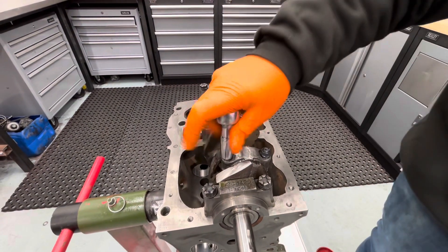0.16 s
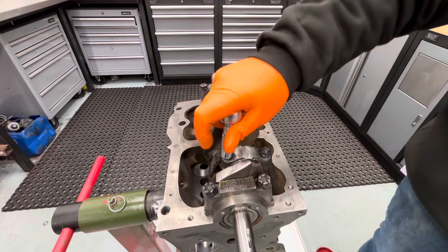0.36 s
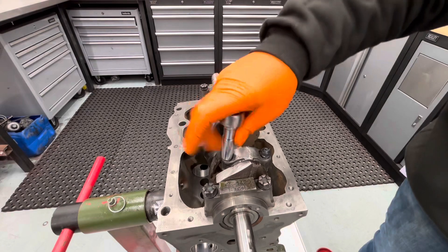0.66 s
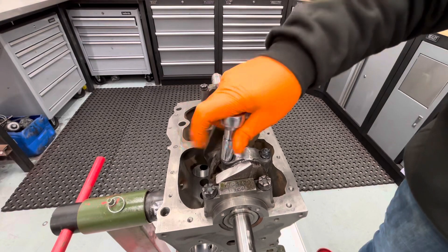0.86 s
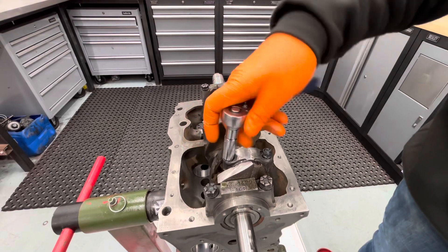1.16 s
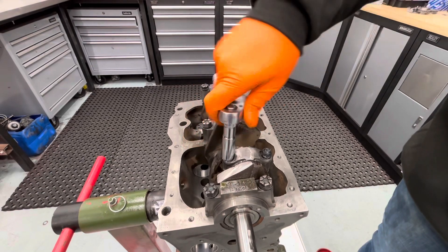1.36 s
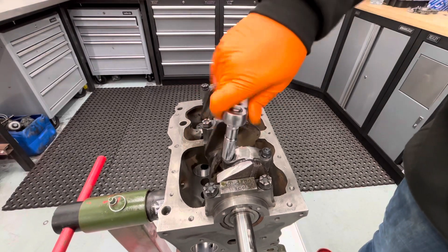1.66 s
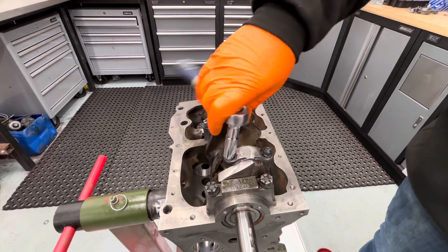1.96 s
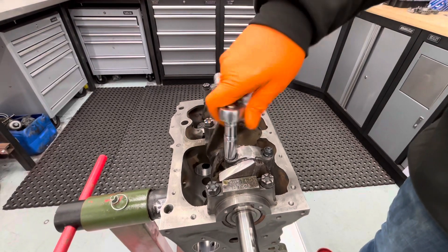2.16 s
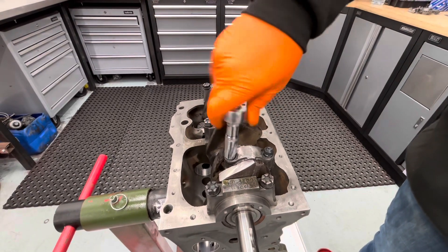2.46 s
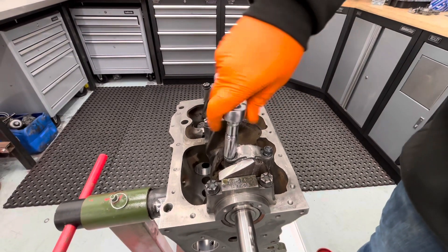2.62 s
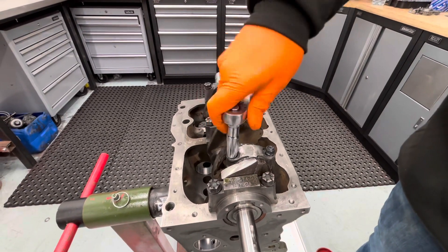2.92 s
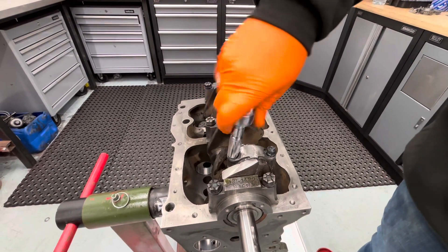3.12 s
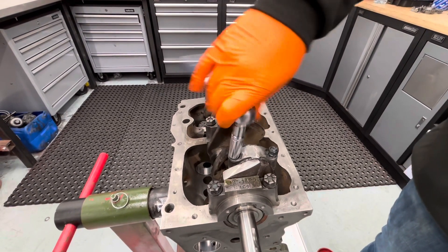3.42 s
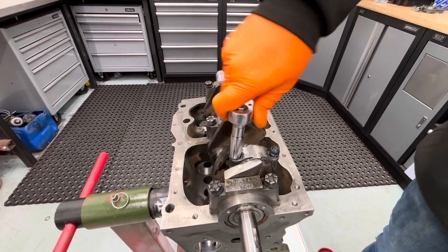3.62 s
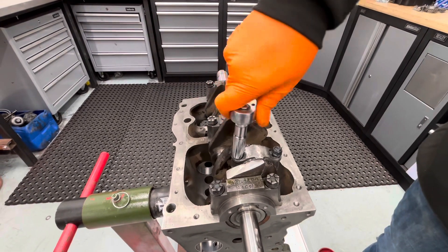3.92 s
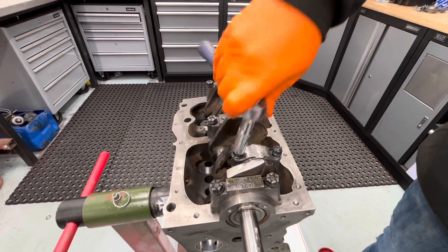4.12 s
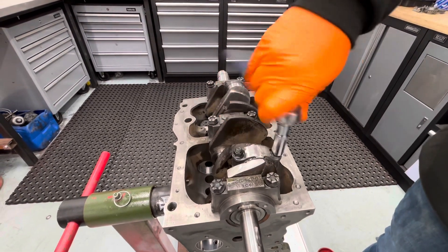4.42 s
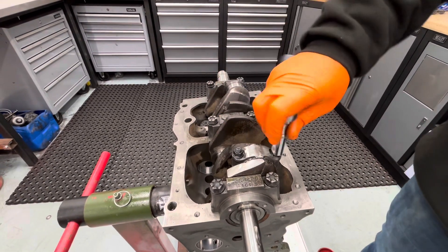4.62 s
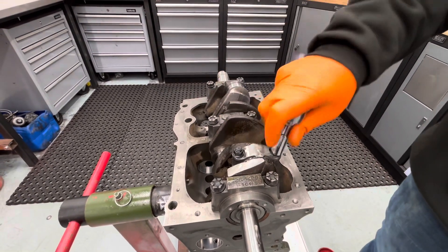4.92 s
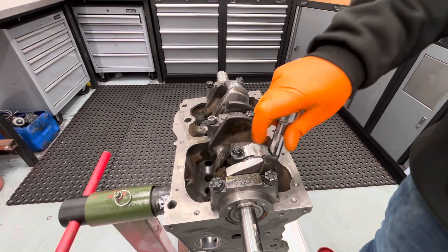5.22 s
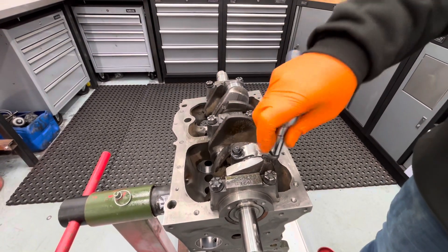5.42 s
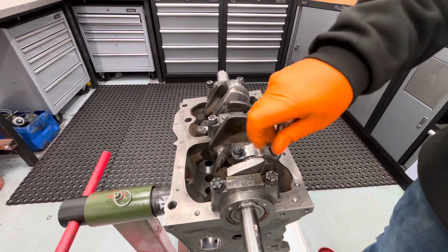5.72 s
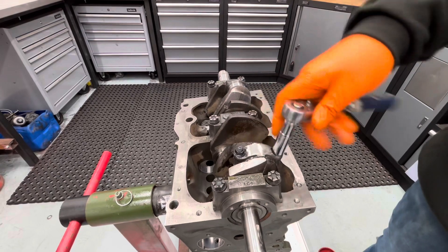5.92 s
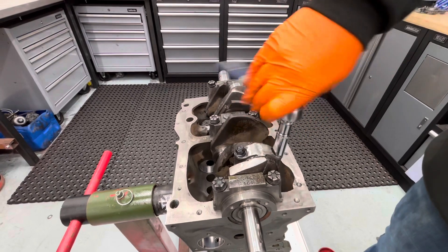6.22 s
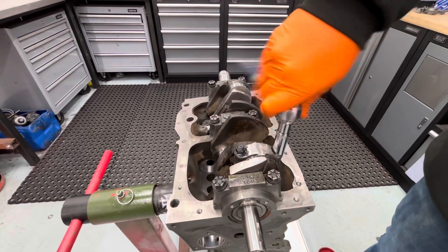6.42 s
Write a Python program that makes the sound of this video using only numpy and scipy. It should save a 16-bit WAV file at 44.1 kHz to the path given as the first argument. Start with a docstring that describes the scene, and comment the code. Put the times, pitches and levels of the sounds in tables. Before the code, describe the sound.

Close, crisp ratchet clicks on an engine block in a workshop. Eight quick, bright zips come in a steady run, with small socket clacks between. After a looser, sparser passage the zips turn into slower, softer rattles at a regular pace. The socket clinks onto another nut, quick zips return, then slower rattles finish. A faint low fan hum wavers behind, and the room leaves a short tail.

```python
"""A quick zip of ratchet teeth over a wavering fan hum: a hand ratchet runs nuts down bolts of an engine block.
On each back-stroke the pawl skips over the teeth, zipping when fingers twirl the head, rattling when the
handle swings. Each tooth is a shaped burst of noise that rings the steel tool; the socket clacks and chinks,
and soft knocks ring the casting. The block answers with quick reflections, the workshop with a decaying tail.
The fan is a set of wandering tones over a rush of air and a faint hiss."""
import sys
import numpy as np
from scipy import signal
from scipy.fft import rfft, irfft, next_fast_len
from scipy.io import wavfile

SR = 44100
rng = np.random.default_rng(int(sys.argv[2]) if len(sys.argv) > 2 else 0)


def dump_mix(stems):
    """Bounce the given channels to the path in sys.argv[1] as a 16-bit WAV at rate SR."""
    frames = np.atleast_2d(stems).T  # one column per channel
    limited = np.clip(frames, -1, 1)  # hard clip at full scale
    pcm = np.round(limited * 32767).astype(np.int16)
    wavfile.write(sys.argv[1], SR, pcm)


N = 289781
TIME = np.arange(N) / SR
SIZE = next_fast_len(N + SR // 100)
FREQ = np.maximum(np.fft.rfftfreq(SIZE, 1 / SR), 1)

# back-strokes of the ratchet, fast when twirled, slow when swung:
# [start t/s, length/s, top speed/teeth per s, relative level/dB, extra force on first teeth/dB, treble tint/dB]
BACKSTROKES = [(0.014, .025, 720, -30.5, -4, 0.5), (.134, 0.0285, 700, -31.5, 3, 2),
               (0.252, .035, 670, -33, 2, 2), (0.364, .031, 850, -31, -3, -1),
               (0.485, .032, 1000, -31.5, 2, 1.5), (0.593, .038, 650, -33, 1, 0),
               (0.715, .036, 830, -32.5, 2, 1), (0.831, .031, 750, -33, 4, 1),
               (0.9528, .011, 340, -36, 0, 2), (1.286, .056, 260, -38.5, 0.5, 0),
               (1.45, .045, 333, -36, 0, -4), (1.573, .0091, 230, -39.5, -1, -2),
               (1.8914, 0.022, 120, -45, 0, -7), (2.097, .008, 230, -42, 6, 5.5),
               (2.584, .053, 333, -37, 3, -3), (2.739, .042, 260, -38.5, -1, 0.5),
               (2.887, .04, 310, -37.5, -1, -0.5), (3.0238, .04, 375, -37, -0.5, 0.5),
               (3.173, .038, 290, -38.7, -1, -0.5), (3.3138, .046, 306, -39, 1, -2),
               (3.4538, .044, 310, -36, 2, -1), (3.5968, .047, 303, -37, 3, -1.5),
               (3.735, .043, 363, -35, -1, -1.5), (3.872, .041, 340, -36, -1, 0),
               (4.01, .04, 350, -37, -1.5, 0.5), (4.145, 0.019, 300, -39.5, 0, 2.5),
               (4.543, .013, 220, -46, -5, 6), (4.69, .027, 410, -40.5, 3, -0.5),
               (4.831, .033, 660, -33, -1.5, -2), (4.9646, 0.0251, 800, -31, -5, -3),
               (5.094, .031, 600, -31.5, 1, -2.5), (5.22, .032, 800, -34, -1, -1.5),
               (5.356, .043, 750, -35, 3, -1), (5.483, .038, 560, -35, -1, 1),
               (5.616, .037, 700, -34, -1, -1.5), (5.751, 0.033, 282, -38, -13, -0.5),
               (6.068, .054, 257, -37, 5, -3.5), (6.249, .046, 353, -39, -3, -1.5),
               (6.396, .052, 400, -40.5, -1, -1), (6.539, .043, 350, -40.5, 1.5, 0.5)]
TWIRL_TEETH_PER_S, FULL_SWING_S = 500, .03   # twirled from this speed up; a longer slow stroke is a full swing
NUT_CHANGE_S = 4.3   # work moves from the first nut to the second
CLANK_HZ, SPARKLE_HZ = 3500, 9000   # clank is the part below, sparkle the part above
NUDGE_CLANK_DB = 1   # low clank of a tool that is only nudged
STROKE_SPARKLE_DB = -1.04   # treble tint of the pawl on the teeth, before that of each stroke


def from_db(db):
    """Decibels to gain."""
    return 10 ** (np.asarray(db) / 20)


def rms_one(x):
    """Scale to rms 1."""
    return x / np.sqrt(np.mean(x ** 2) + 1e-20)


def at_hz(points, hz):
    """Read a table on a log-frequency axis, level beyond its ends."""
    points = np.array(points)
    return np.interp(np.log(hz), np.log(points[:, 0]), points[:, 1])


def to_time(spectrum):
    """From a spectrum back to sound."""
    return irfft(spectrum, SIZE)[..., :N]


def colour(x, gain_db):
    """Filter by a gain in dB at every frequency."""
    return to_time(rfft(x, SIZE) * from_db(gain_db))


def noise(spectrum):
    """Steady noise of the given colour, rms 1."""
    return rms_one(colour(rng.standard_normal(N), at_hz(spectrum, FREQ)))


def drift(rate):
    """Slow random wander, mostly below the rate in Hz, with rms 1."""
    return rms_one(to_time(rfft(rng.standard_normal(SIZE)) / (1 + (FREQ / rate) ** 2)))


def convolve(x, response):
    """Pass a sound through a response in each channel."""
    return signal.fftconvolve(np.atleast_2d(x), np.atleast_2d(response), axes=-1)[:, :N]


def ringing(modes):
    """Response of a set of decaying modes (Hz, dB, t60 s), half a second long."""
    t = TIME[:SR // 2]
    return sum(from_db(db - 60 * t / t60) * np.sin(2 * np.pi * hz * t) for hz, db, t60 in modes)


def impulses(times, sizes):
    """A train of single-sample blows."""
    at = np.round(np.asarray(times) * SR).astype(int)
    return np.bincount(np.maximum(at, 0), sizes, N)[:N]


def on_nut(table, nut):
    """The dB curve of a table for the first (0) or second (1) nut."""
    return at_hz(np.array(table)[:, [0, nut + 1]], FREQ)


def by_nut(x):
    """Split a sound into what happens on the first nut and on the second."""
    return enumerate([x * (TIME < NUT_CHANGE_S), x * (TIME >= NUT_CHANGE_S)])


def spread(mid, side):
    """Diffuse sound: mixing two noises sets how alike the left and right channels are at each frequency."""
    # likeness of the air noise left and right: [f/Hz, correlation]
    likeness = [(30, 0.096), (70, 0), (150, 1), (350, 0.74), (700, 0), (1500, 0), (15000, 0.000087)]
    alike = np.clip(at_hz(likeness, FREQ), -.99, .99)
    shared = rfft(mid, SIZE) * np.sqrt((1 + alike) / 2)
    opposed = rfft(side, SIZE) * np.sqrt((1 - alike) / 2) * [[1], [-1]]
    return to_time(shared + opposed)


def fan(waver=0.46, waver_hz=3.3, width_db=-17.5, rush_db=-48.5, hiss_db=-57.5):
    """The fan behind: steady tones that wander in strength and phase, on a rush of air with a faint hiss."""
    # tones of the hum: [f/Hz, level/dB rms]
    hum_tones = [(71, -69), (93, -65), (107, -66), (115, -63), (130, -62.5), (153, -69), (188, -62),
                 (212.2, -59.5), (215.7, -53.5), (219, -61.5), (237, -65), (290, -64), (317.6, -58.5),
                 (325, -63.5), (349.9, -57.5), (372, -66), (393.5, -62), (416, -61), (436, -62),
                 (446, -62.5), (455, -64.5), (482, -66.5), (501.5, -64.5), (595, -69), (668, -68.5),
                 (698, -71.5), (725, -68), (786, -64.5), (797, -70)]
    # colour of the rush, which sets its shape only: [f/Hz, density/dB per Hz]
    rush_spectrum = [(25, -44), (55, -49), (75, -14), (115, 1.5), (165, -3), (235, 1.5), (268, -7),
                     (310, 5.5), (380, -1), (450, -1), (530, -4), (810, -0.5), (840, -8.5), (1000, -10.5),
                     (1400, -16.5), (2500, -58)]
    # colour of the hiss, which sets its shape only: [f/Hz, density/dB per Hz]
    hiss_spectrum = [(500, 9), (1500, 1.5), (2500, 7), (4000, 3), (8000, -3), (15000, -13)]
    wander, tones = drift(waver_hz), np.zeros((2, N))
    steady_power = np.sqrt(2 / (1 + 2 * waver ** 2))   # makes up for the power that wavering adds
    for hz, db in hum_tones:
        angle = 2 * np.pi * (hz * TIME + rng.random())
        # every tone takes the same wander at shifts of its own
        strength, phase, sway = [np.roll(wander, shift) for shift in rng.integers(N, size=3)]
        width = from_db(width_db) * sway * [[1], [-1]]   # a little different left and right
        tone = (1 + waver * strength) * np.cos(angle) + (waver * phase + width) * np.sin(angle)
        tones += from_db(db) * steady_power * tone
    mid, side = [from_db(rush_db) * noise(rush_spectrum) + from_db(hiss_db) * noise(hiss_spectrum)
                 for _ in range(2)]
    return tones + spread(mid, side)


def teeth(end_speed=.6, twirl_end_speed=.3, jitter=0.06, uneven_db=1.5, stroke_db=-1.0, first_teeth=2.0):
    """Rows (s, dB, clank, sparkle), one per tooth: the wheel speeds up, slows, then coasts over a few soft teeth."""
    # lone teeth, when the handle is only nudged or the pawl catches and snaps hard: [t/s, energy/dB]
    lone_teeth = [(.0078, -10), (0.1426, -6.5), (0.2555, -12), (.3638, -19), (1.581, -16.5), (1.6965, -17),
                  (1.709, -16), (1.7198, -16), (1.7245, -14.5), (1.7298, -12.5), (1.8264, -13),
                  (1.833, -24), (1.8407, -14), (2.0842, -15), (2.0883, -12.5), (2.105, -15),
                  (2.1185, -13.5), (2.1278, -18), (2.2402, -15.5), (2.243, -21), (2.25, -15.5),
                  (2.4025, -16), (2.41, -19), (3.1683, -14), (3.172, -14), (3.63, -11), (4.4399, -20.5),
                  (4.452, -19), (4.539, -19.5), (5.7502, -21), (6.062, -13), (6.2465, -13), (6.3961, -19),
                  (6.4005, -16)]
    # rise towards mid-stroke at the speed of a swing; faster strokes swell more, slow ones may sag
    swell_db, swell_db_per_octave, swing_teeth_per_s = 0.5, 4, 300
    swing_coast_db, twirl_coast_db = -5, -38   # a swing carries on softly at its end; a twirl stops short
    swing_clank_db, twirl_clank_db = 0.5, 2.5
    first_tooth_sparkle_db = 5   # the first drops of a swing are brighter
    wobble_db, wobble_s = 1.5, .0035   # the wheel rocks in the head: stronger and weaker bunches of teeth

    rows = []
    phase = np.linspace(0, 1.3, 260)   # in stroke lengths; the wheel coasts after 1
    arch = np.maximum(np.sin(np.pi * phase), 0)
    coasting = np.maximum(phase - 1, 0) / (phase[-1] - 1)
    for start, length, top, db, bite_db, tint_db in BACKSTROKES:
        slip, catch = rng.standard_normal(128), rng.exponential(1, 128)
        swung = top < TWIRL_TEETH_PER_S
        coast_db = swing_coast_db if swung else twirl_coast_db
        swell = swell_db + swell_db_per_octave * np.log2(top / swing_teeth_per_s)

        slowest = end_speed if swung else twirl_end_speed   # share of top speed
        speed_arch = np.sqrt(arch) if swung else arch
        speed = top * (slowest + (1 - slowest) * speed_arch) * (1 - .5 * coasting)
        passed = np.cumsum(speed) * length * phase[1]
        tooth = np.arange(int(passed[-1]) + 1)
        when = np.interp(tooth + jitter * slip[tooth], passed, phase)

        early = np.exp(-tooth / first_teeth)   # weight on the first teeth, while the wheel is still slow
        force_db = np.interp(when, phase, swell * arch + coast_db * coasting) + bite_db * early
        force_db = force_db + uneven_db * np.minimum(catch[tooth], 4)   # now and then a tooth snaps harder
        rocking = rng.standard_normal(32)
        force_db = force_db + wobble_db * np.interp(when * length / wobble_s, np.arange(len(rocking)), rocking)

        # the energy of the stroke is shared among its teeth
        share_db = 10 * np.log10(length * SR / np.sum(from_db(force_db) ** 2))
        level = db + stroke_db + force_db + share_db
        sparkle = STROKE_SPARKLE_DB + tint_db + first_tooth_sparkle_db * early * swung
        if not swung:
            clank = twirl_clank_db
        elif length > FULL_SWING_S:
            clank = swing_clank_db
        else:
            clank = NUDGE_CLANK_DB
        rows += [(start + u * length, d, clank, high) for u, d, high in zip(when, level, sparkle)]
    return rows + [(s, db, NUDGE_CLANK_DB, STROKE_SPARKLE_DB) for s, db in lone_teeth]


def socket_play(click_db=-4.5, take_up_lead_s=0.0098, take_up_db=-23.5):
    """Rows (s, dB, clank, sparkle): the loose socket clacks on the nut, takes up its play and ticks after strokes."""
    # single clacks of the socket against the nut: [t/s, energy/dB before click_db]
    nut_clacks = [(0.2463, -25), (.3505, -17), (.402, -3.5), (1.0345, -20), (1.0703, -9), (1.431, -18.5),
                  (1.636, -20.5), (1.683, -18.5), (1.769, -19), (1.808, -24), (1.817, -22), (2.004, -23.5),
                  (2.03, -16), (2.154, -19), (2.187, -20.5), (2.3843, -13), (2.3875, -14.5),
                  (2.5674, -11.5), (2.715, -23), (2.802, -18), (3.229, -13), (4.134, -20), (4.3146, -13),
                  (4.3164, -18), (4.353, -13.5), (4.355, -12), (4.3575, -21), (4.382, -29), (4.502, -23),
                  (5.479, -20), (5.92, -27.5), (6.029, -19.5), (6.0419, -26), (6.319, -13)]
    clank_db, sparkle_db = 7.5, -4   # the socket sounds duller than the pawl
    rattle_within_s, rattle_db, rattle_spread_db = 0.096, -33, 2   # one faint tick after each stroke
    clacks = [(s, db + click_db) for s, db in nut_clacks]
    # before a full swing, the play in the socket is taken up with a soft click
    take_ups = [(start - take_up_lead_s, take_up_db) for start, length, top, *_ in BACKSTROKES
                if top < TWIRL_TEETH_PER_S and length > FULL_SWING_S]
    ticks = []
    for start, length, *_ in BACKSTROKES:
        when, size = rng.random(2)
        ticks.append((start + length + rattle_within_s * when, rattle_db + rattle_spread_db * (2 * size - 1)))
    return [(s, db, clank_db, sparkle_db) for s, db in clacks + take_ups + ticks]


def tool_ring(x, grip_s=.13, grip_db=-0.5, grip_pitch=0.0057):
    """The snaps ring in the steel; each new grip shifts the strength and pitch of every resonance."""
    # resonances of ratchet head, extension and socket, before the pawl colour:
    # [f/Hz, gain on first nut/dB, gain on second nut/dB, t60/s]
    tool_modes = [(2486, 1, -1, 0.019), (2610, -6, 4, 0.15), (3390, -16, -3, 0.018), (4740, -13, -8, .04),
                  (5040, -7, -8, 0.1), (6320, -4, -9, 0.013), (6780, -4.5, -15, 0.016),
                  (7300, -4, -21, 0.018), (10100, -6, -11, 0.027), (10460, -3, -4, 0.11),
                  (10600, -3, 10, 0.11), (14700, -7, -15, .012), (15300, -7, -5, 0.01)]
    t, hop = TIME[:SR // 12], round(grip_s * SR)
    hz, first_db, second_db, t60 = np.transpose(tool_modes)[:, :, None]
    damping = np.log(1000) / t60
    decay = 2 * damping / SR * np.exp(-damping * t)   # gain 1 on top of each resonance
    out = np.zeros((2, N + hop + len(t)))
    for at in range(0, N, hop):
        held, detuned = rng.standard_normal((2, len(hz), 1))
        nut_db = first_db if at / SR < NUT_CHANGE_S else second_db
        db = nut_db + grip_db * np.clip(held, -2, 1)
        gripped_hz = hz * (1 + grip_pitch * detuned)
        ring = np.sum(from_db(db) * decay * np.cos(2 * np.pi * gripped_hz * t), axis=0)
        rung = signal.fftconvolve(x[:, at:at + hop], ring[None], axes=-1)
        out[:, at:at + rung.shape[1]] += rung
    return x + out[:, :N]


def ratchet(snap_s=0.00019, snap_slope=0.81, colour_db=1.5, turn_db=1.2, alike=.62, lag_s=.00005,
            bounce_s=0.00063, bounce_share=0.079, pawl_db=-0.5):
    """Each drop of the pawl is a sharp snap and a bounce, with a colour of its own, which sets the tool ringing."""
    # colour of the snaps and their ring: [f/Hz, gain on first nut/dB, gain on second nut/dB]
    pawl_colour = [(900, -12, -9.5), (1650, -10.5, -9), (2250, -5, -5), (2720, -7.5, -7.5),
                   (3680, 0.5, -0.5), (4430, 3.5, 6), (5600, 2.5, 4.5), (6300, 2, 1), (7360, 0, 4),
                   (8300, 2.5, 4.5), (9200, 2, 7.5), (10630, 8, 8), (11240, 1.5, 4), (13000, 6, 9.5),
                   (14600, 4.5, 5.5), (15500, 0.5, 3)]
    s, db, clank, sparkle = np.transpose(teeth() + socket_play())
    bounce_at = s + bounce_s * (.5 + rng.random(len(s)))
    share = np.clip(2 * bounce_share * rng.random(len(s)), 0, 1)   # of the energy
    # fine grain of the snaps, partly the same left and right
    own = rng.choice([-1., 1.], (2, N))
    grain = np.where(rng.random(N) < alike, own[0], own)
    centres, spectrum = np.array([2400, 4400, 6400, 8300, 10600, 14000]), 0   # band centres in Hz
    turn_times = TIME[::SR // 10]
    for hz in centres:
        fade = np.exp(-(hz / SPARKLE_HZ) ** snap_slope / (snap_s * SR))   # the low part of a snap lasts longer
        level = db + clank * (hz < CLANK_HZ) + sparkle * (hz > SPARKLE_HZ)
        level = level + colour_db * rng.standard_normal(len(s))
        # the tint shifts as the tool turns
        level = level + turn_db * np.interp(s, turn_times, rng.standard_normal(len(turn_times)))
        power = from_db(level) ** 2
        blows = impulses(s, (1 - share) * power) + impulses(bounce_at, share * power)
        energy = signal.lfilter([(1 - fade) ** 2], [1, -2 * fade, fade ** 2], blows + 1e-18)
        band = np.interp(FREQ, centres, centres == hz)
        spectrum = spectrum + rfft(np.sqrt(np.abs(energy)) * grain, SIZE) * band
    radiated = FREQ / np.hypot(FREQ, 600)   # a small part radiates little bass
    arrival = np.exp(-2j * np.pi * FREQ * [[lag_s], [0]])   # reaches the left channel later
    snaps = tool_ring(to_time(spectrum * radiated * arrival))
    return sum(colour(part, pawl_db + on_nut(pawl_colour, nut)) for nut, part in by_nut(snaps))


def knocks(low_hz=300):
    """A few soft blows ring the modes of the heavy casting, which gives out little below its lowest mode."""
    # dull knocks on the engine: [t/s, strength/dB]
    blow_list = [(0.0874, -44), (0.0903, -46.5), (0.0934, -49.5), (0.0969, -40.5), (0.0991, -43),
                 (0.1171, -48)]
    # what a knock rings with, before the low cut: [f/Hz, level/dB, t60/s]
    casting_modes = [(355, -2, 0.089), (406, 2, 0.096), (460, -3, .06), (510, -2.5, 0.092), (576, 5, 0.04),
                     (666, 0, 0.04), (840, -9, 0.015), (1093, -2, 0.03), (1360, -14, 0.025),
                     (1730, -0.5, 0.0089)]
    s, db = np.transpose(blow_list)
    rung = convolve(impulses(s, from_db(db)), ringing(casting_modes))
    return signal.sosfilt(signal.butter(2, low_hz, "high", fs=SR, output="sos"), rung)


def chinks(count=9, scatter=0.08):
    """The loose socket rings with a cluster of close decaying partials around a pitch given for each chink."""
    # chinks as the socket shifts, lifts off and settles on a nut: [t/s, level/dB, centre f/Hz, t60/s]
    chink_list = [(0.845, -43, 2560, 0.17), (1.0726, -41, 6300, 0.0036), (4.317, -42, 3420, 0.085),
                  (4.316, -39, 4370, 0.023), (4.3545, -43, 3400, 0.04), (4.698, -28.5, 8250, 0.025),
                  (4.705, -30.5, 8700, 0.034), (4.718, -39, 8730, .04)]
    out = np.zeros(N)
    for s, db, hz, t60 in chink_list:
        places = np.linspace(-1, 1, count) + rng.uniform(-0.069, 0.093, count)
        partials = hz * (1 + scatter * places)
        ring = sum(rng.choice([-1, 1]) * ringing([(f, db, t60)]) for f in partials) / np.sqrt(count)
        at = round(s * SR)
        out[at:at + len(ring)] += ring
    return out


def block_reflections(x, hand_move_s=.06, decay_s=0.0035, block_db=-1):
    """Quick reflections off the block and the hand; their pattern keeps changing as hand and tool move."""
    t, hop = TIME[:SR // 30], round(hand_move_s * SR)
    shape = np.exp(-t / decay_s) * (1 - np.exp(-t / decay_s))
    out = np.zeros((2, N + hop + len(t)))
    for at in range(0, N, hop):
        pattern = rms_one(rng.standard_normal((2, len(t))) * shape) / np.sqrt(len(t))
        echo = signal.fftconvolve(x[:, at:at + hop], pattern, axes=-1)
        out[:, at:at + echo.shape[1]] += echo
    return from_db(block_db) * out[:, :N]


def workshop(x, room_db=-5.5, build_s=.007, dull_hz=14000, clump_db=3):
    """Direct sound, quick reflections off the engine block, then the room's tail dying band by band."""
    # reverberation of the workshop: [f/Hz, t60/s]
    room_t60 = [(700, 0.2), (2500, 0.5), (5000, 0.31), (10000, 0.29), (15000, 0.27)]
    # lean of the direct sound: [f/Hz, left minus right on first nut/dB, left minus right on second nut/dB]
    towards = [(1980, 4.5, 2.5), (4000, -1, -3.5), (6300, -5.5, -9.5), (10700, -1.5, -0.5),
               (14000, -4, -11)]
    t = TIME[:SR // 2]
    clump_times = t[::SR // 400]   # echoes arrive in clumps
    clumps = from_db(clump_db * np.interp(t, clump_times, rng.standard_normal(len(clump_times))))
    hz = np.fft.rfftfreq(len(t), 1 / SR)
    # the room swallows the top
    echoes = rfft(clumps * rng.standard_normal((2, len(t)))) / np.hypot(1, (hz / dull_hz) ** 2)
    edges, tail = np.geomspace(100, SR / 2, 14), 0
    for low, high in zip(edges, edges[1:]):
        band = irfft(echoes * ((hz >= low) & (hz < high)), len(t))
        tail = tail + band * from_db(-60 * t / at_hz(room_t60, np.sqrt(low * high)))
    tail = tail * (1 - np.exp(-t / build_s))
    response = from_db(room_db) * rms_one(tail) / np.sqrt(len(t))
    direct = sum(colour(part, on_nut(towards, nut) * [[.5], [-.5]]) for nut, part in by_nut(x))
    return direct + block_reflections(x) + convolve(x, response)


def scene():
    """The tool and the engine in the room, over the fan."""
    return workshop(ratchet() + chinks() + knocks()) + fan()


def record(dry, low_cut_hz=34, cutoff_hz=15750):
    """The microphone loses the deep bass, and the top is cut steeply."""
    thin = signal.sosfilt(signal.butter(2, low_cut_hz, "high", fs=SR, output="sos"), dry)
    return signal.sosfilt(signal.ellip(12, .1, 80, cutoff_hz, fs=SR, output="sos"), thin)


dry = scene()
out = record(dry)
dump_mix(out)
```